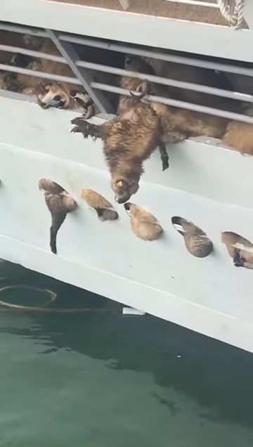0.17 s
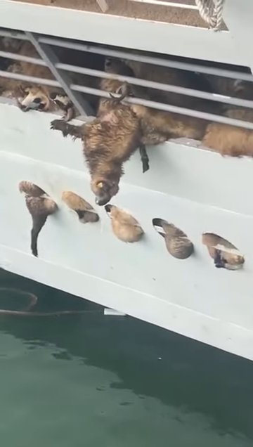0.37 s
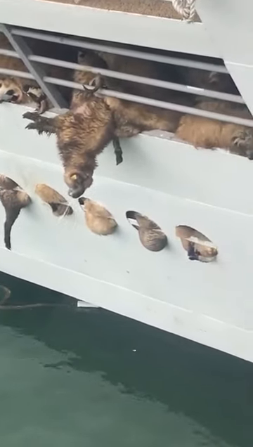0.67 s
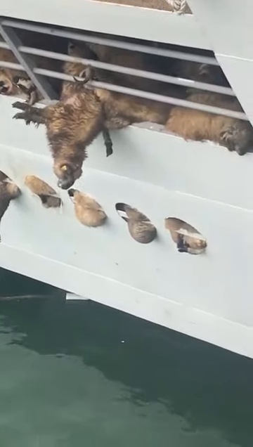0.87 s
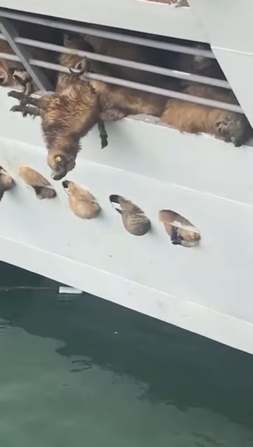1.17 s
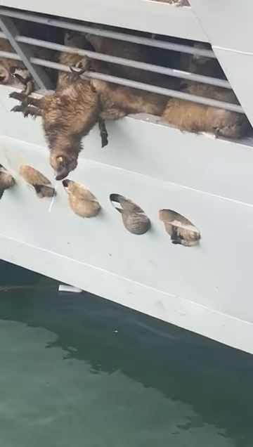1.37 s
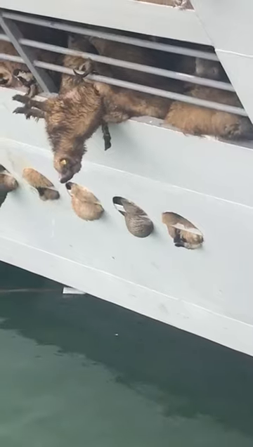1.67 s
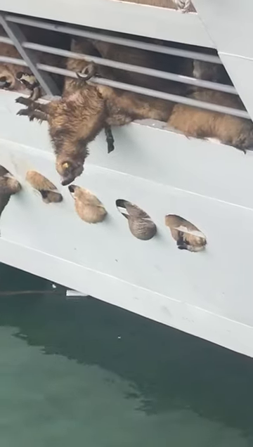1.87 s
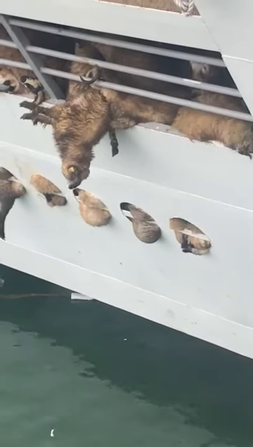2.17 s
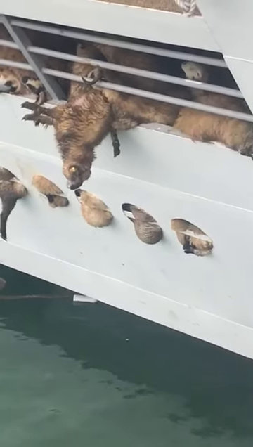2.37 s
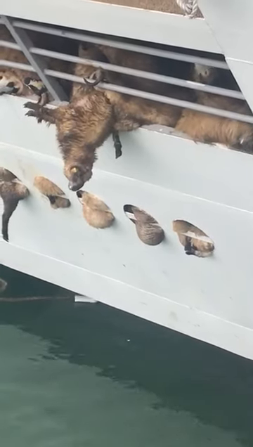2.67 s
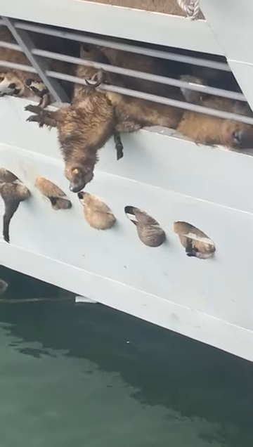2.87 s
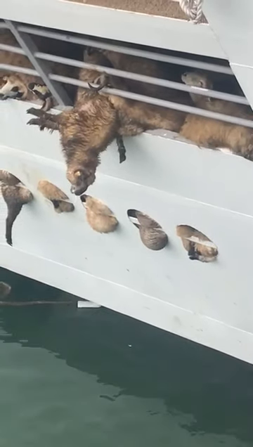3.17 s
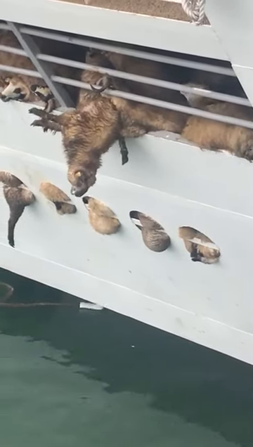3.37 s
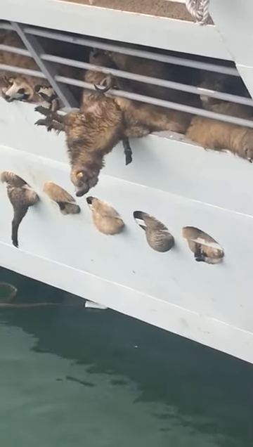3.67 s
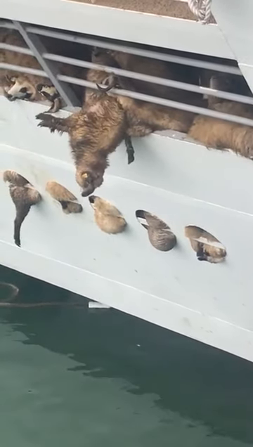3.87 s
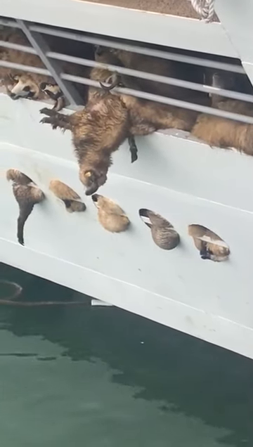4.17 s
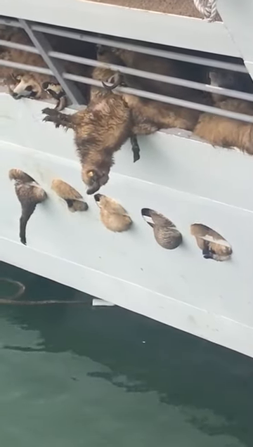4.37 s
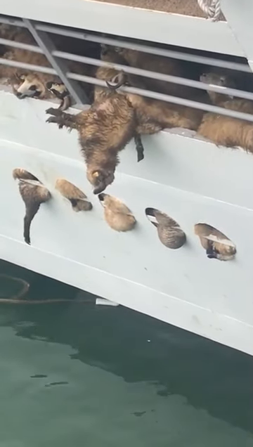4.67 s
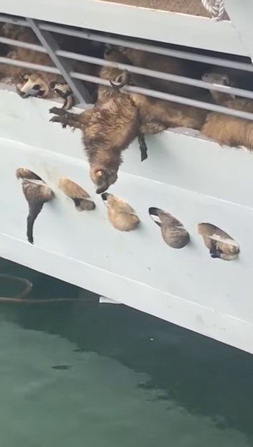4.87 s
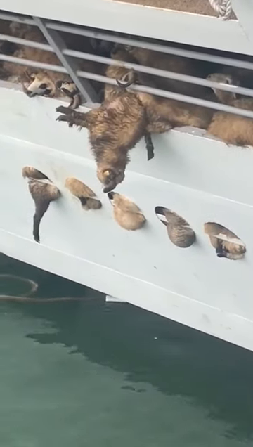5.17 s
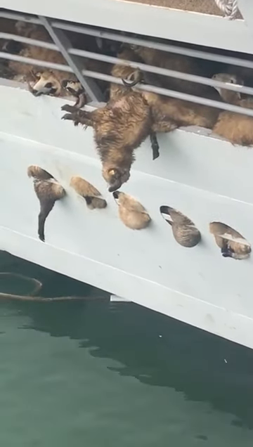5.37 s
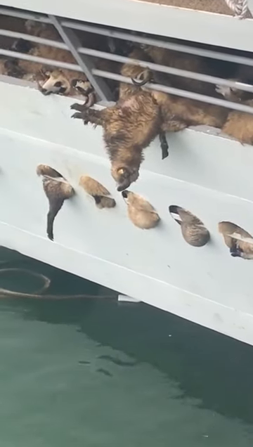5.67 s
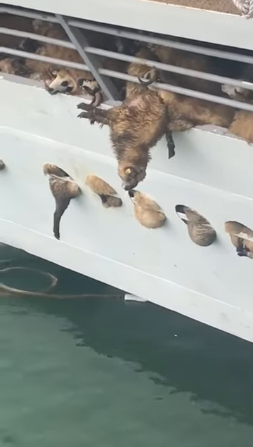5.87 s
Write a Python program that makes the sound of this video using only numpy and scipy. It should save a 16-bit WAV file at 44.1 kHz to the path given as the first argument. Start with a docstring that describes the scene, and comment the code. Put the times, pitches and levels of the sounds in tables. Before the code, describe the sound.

A large ship's engine runs for the whole six seconds, heard outdoors from beside the hull in a harbour. The main sound is a deep, steady diesel drone with a rough exhaust rumble, throbbing slowly as the generators beat against it. Above it, ventilation fans give an even, airy roar with a little hiss and hum, plus a faint mid-pitched whine that pulses about once a second and gradually fades. Small waves slop softly against the hull at about 0.5, 1, 2.8, 3.7, 5 and 5.5 seconds; the one at 2.8 seconds is the fullest, with a low gulp. Faint, bright ticks come at around 1.2, 2.4 and 3.7 seconds, with a quick pair at 5.5. At about 5.9 seconds a thin, rasping metal scrape begins and lasts to the end, while the rumble carries on at the same level.

```python
"""A ship in harbour

Beside the hull, the harmonics of a slow main diesel and of three generators, nearly in step,
superpose and beat over the rough rumble of turbulent exhaust gas. Ventilation fans roar with
broadband flow noise and hum at their blade tones. Water slops softly at the hull; there are
a few faint ticks and, at the end, a thin scrape as friction excites the resonances of metal."""
import sys
import numpy as np
from scipy import signal
from scipy.fft import rfft, irfft, next_fast_len
from scipy.io import wavfile

SR = 44100
rng = np.random.default_rng(int(sys.argv[2]) if len(sys.argv) > 2 else 0)


def generate_wav(sig):
    """Save sig (samples, or channels by samples) to the path in sys.argv[1] as 16-bit PCM at SR."""
    pcm = np.round(np.clip(np.atleast_2d(sig).T, -1, 1) * 32767).astype(np.int16)
    wavfile.write(sys.argv[1], SR, pcm)


N = 264776
TIME = np.arange(N) / SR  # t/s


def main_diesel():
    """Periodic firing: a slow engine drones at multiples of its cycle rate and eases off a little."""
    # harmonics of the drone: order, level/dB at unit gain
    orders = [(9, -35), (10, -48), (12, -24.5), (14, -42.5), (15, -28.5), (17, -46), (19, -40.5),
              (25, -37.5), (26, -42.5), (27, -43), (29, -47.5), (31, -44.5), (50, -46)]
    # envelope of the drone: t/s, gain/dB
    envelope = [(0, -0.6), (1.4, -0.1), (2.6, 1), (4.3, -2), (5.3, -3.7), (5.8, 1)]
    cycle_hz, ease_s, ease_share = 5.418, 4.0, 0.001
    speed_hz = cycle_hz * (1 - ease_share * (TIME > ease_s))
    return along(envelope) * engine(speed_hz, orders, cycle_start_s=1.7445, unsteady=0.057)


def engine(speed_hz, orders, cycle_start_s, unsteady):
    """Fourier synthesis: each order wavers with the combustion; the low ones align as a cycle begins."""
    scatter_hz = 200  # above this, echoes from the hull scatter the phases
    turns = np.cumsum(speed_hz * np.ones(N)) / SR
    turns -= np.interp(cycle_start_s, TIME, turns)
    out = np.zeros(N)
    for order, db in orders:
        scatter = rng.random() * (order * np.mean(speed_hz) > scatter_hz)
        waver = 1 + unsteady * drift(1.5)
        out -= waver * tone(order * turns + scatter, db)
    return out


def generators(first_speed_hz):
    """Beating: the harmonics of three generators at nearly one speed add up to a slow throb."""
    # harmonics of the first generator: order, level/dB at unit gain
    first_orders = [(5, -26.3), (10, -30.5)]
    # envelope of the first generator: t/s, gain/dB
    envelope = [(0, -0.5), (1.1, -1.5), (1.7, 1), (2.2, 0.5), (2.7, -1.5), (3.5, 2.5), (4.6, 2), (5.3, -.5),
                (6, 0)]
    # harmonics of the second generator: order, level/dB
    second_orders = [(5, -49.5), (6, -36.5), (12, -40), (27, -46.5), (28, -47.5), (29, -49), (30, -48)]
    # harmonics of the third generator: order, level/dB
    third_orders = [(3, -34.5), (6, -47), (10, -49), (11, -39.5), (12, -35), (14, -47.5), (17, -45.5),
                    (18, -48), (24, -54.5)]
    second_hz, third_hz = 14.95, 15.035
    # the cycle starts set how the throbs fall together
    first = engine(first_speed_hz, first_orders, cycle_start_s=1.8478, unsteady=0.027)
    second = engine(second_hz, second_orders, cycle_start_s=1.8844, unsteady=0.1)
    third = engine(third_hz, third_orders, cycle_start_s=1.7415, unsteady=0.16)
    return along(envelope) * first + second + third


def generator_speed():
    """Speed droop: a passing load slows the first generator; its governor then settles a little high."""
    cycle_hz, sag_s, sag_width_s = 15.105, 2.27, 0.45
    sag_share, overshoot_share = 0.0068, 0.0008
    sag = sag_share * np.exp(-((TIME - sag_s) / sag_width_s) ** 2)
    return cycle_hz * (1 - sag + overshoot_share * (TIME > sag_s))


def exhaust(speed_hz):
    """Amplitude modulation: turbulent gas leaves the funnel in puffs, several to an engine cycle."""
    # spectrum of the deep boom: f/Hz, relative density/dB
    boom_spectrum = [(10, -20), (24, -13), (36, -10), (46, -1), (52, 9.5), (60, 9), (72, 5.5), (84, 2),
                     (97, 5), (106, 10.5), (125, -13), (200, -43)]
    # envelope of the boom: t/s, level/dB between crest and trough of the puffs
    boom_envelope = [(0, -29.5), (.75, -28), (1.9, -30.5), (2.45, -29.5), (3.15, -29.5), (4.2, -30),
                     (5.0, -28.5), (6, -29)]
    # spectrum of the growl, with the funnel's resonances: f/Hz, relative density/dB
    growl_spectrum = [(70, -17), (112, -2), (135, -.8), (149, 2), (160, -3.5), (172, .7), (190, 1.2),
                      (212, -.8), (236, -7.5), (254, -4.5), (266, -9.5), (282, -6.5), (305, -10.5),
                      (450, -18.5), (900, -64)]
    # envelope of the growl: t/s, level/dB between crest and trough of the puffs
    growl_envelope = [(0, -25), (.32, -26), (.41, -25), (.52, -26), (.72, -27), (1.12, -24), (1.4, -25),
                      (2.6, -23.5), (2.75, -29), (2.87, -26.5), (2.98, -27), (3.37, -22.5), (3.8, -27.5),
                      (4.08, -23), (4.25, -26.5), (4.8, -24), (5.05, -24), (5.45, -26), (6, -25.5)]
    puffs_per_cycle, depth = 5, 0.16
    turns = np.cumsum(speed_hz) / SR
    puffs = 1 + depth * np.cos(2 * np.pi * puffs_per_cycle * turns)
    boom = coloured(boom_spectrum) * along(boom_envelope)
    growl = coloured(growl_spectrum) * along(growl_envelope)
    return puffs * (boom + growl)


def fan_airflow():
    """Flow noise: the roar of the fans and the hiss of the grilles share one slightly uneven airflow."""
    # air rushing through the fans: f/Hz, relative density/dB
    roar_spectrum = [(100, -22), (300, -1), (420, 0), (500, -2), (595, 1.5), (650, 0), (720, -1),
                     (780, -3.5), (830, -0.8), (900, -1.7), (990, -1), (1200, -4), (1290, -5.5), (1350, -6),
                     (1400, -4), (1470, -6.5), (1570, -8), (1900, -12), (2900, -19.5), (9000, -47.5)]
    # hiss at the vent grilles: f/Hz, relative density/dB
    hiss_spectrum = [(1500, -19), (3000, -2), (3700, 2.5), (4400, 3.5), (4900, -2.5), (5300, -2),
                     (7000, -5), (7600, -7.5), (8300, -4.5), (9200, -10.5), (10000, -12.5), (10400, -30),
                     (10900, -31), (12000, -44.5)]
    roar_db, hiss_db, flutter_db, swell_db = -28.5, -47.5, 0.36, 0.19
    flow = gain_of(flutter_db * drift(28) - swell_db * drift(1.8))
    roar = gain_of(roar_db) * coloured(roar_spectrum)
    hiss = gain_of(hiss_db) * coloured(hiss_spectrum)
    return flow * (roar + hiss)


def machinery_hum():
    """Tonal noise of rotation: pumps and fan blades give steady tones, of which the lowest two beat."""
    # tones of pumps and blades: f/Hz, level/dB
    hums = [(31.0, -41), (31.7, -43), (568.1, -54), (672.0, -52), (752.8, -54)]
    return sum(tone(hz * TIME + rng.random(), db) for hz, db in hums)


def fan_whine():
    """Interference: the blade tones of two like fans beat about once a second as they slowly fade."""
    # lower and upper blade tone: f/Hz
    blade_tones = [650.85, 652.0]
    low_hz, high_hz = blade_tones
    start_db, fade_db_per_s, weaker_db, in_step_s = -39.8, 1.7, 7, 2.33
    db = start_db - fade_db_per_s * TIME
    turns = high_hz * TIME + rng.random()
    lead = (high_hz - low_hz) * (TIME - in_step_s)
    return tone(turns, db) + tone(turns - lead, db - weaker_db)


def water():
    """Noise bands under one envelope: each small wave at the hull gulps, washes and fizzes at once."""
    # slops: peak t/s, duration/s, gulp level/dB, wash level/dB, fizz level/dB
    slops = [(.49, .26, -42, -47, -55), (0.997, .2, -56, -44, -59), (2.797, 0.27, -30, -46, -60),
             (3.72, .25, -38, -50, -57), (5.008, 0.32, -36, -52, -60), (5.45, 0.26, -56, -42, -60)]
    gulp = ringing(centre_hz=275, width_hz=84)
    wash = ringing(centre_hz=1830, width_hz=2500)
    fizz = ringing(centre_hz=6960, width_hz=5500)
    grains = gain_of(2.2 * drift(200))
    fizz = unit_rms(fizz * grains)
    out = np.zeros(N)
    for peak_s, length_s, gulp_db, wash_db, fizz_db in slops:
        swell = np.exp(-(2 * (TIME - peak_s) / length_s) ** 2)
        out += swell * (gain_of(gulp_db) * gulp + gain_of(wash_db) * wash + gain_of(fizz_db) * fizz)
    return out


def scrape():
    """Frictional excitation: rasping contact drives several narrow resonances of metal and a broad one."""
    # modes of the metal: f/Hz, bandwidth/Hz, level/dB before the rasp
    modes = [(1730, 350, -42), (1960, 55, -42), (3670, 110, -51), (3880, 480, -46.5), (4900, 3300, -49),
             (5060, 280, -57), (5380, 110, -57)]
    start_s, attack_s, rasp_db, catches_per_s = 5.892, 0.045, 2, 80
    ring = sum(gain_of(db) * ringing(hz, width_hz) for hz, width_hz, db in modes)
    pressure = np.clip((TIME - start_s) / attack_s, 0, 1)
    rasp = gain_of(rasp_db * drift(catches_per_s))
    return ring * pressure * rasp


def ticks():
    """Exponential decay: each faint tick is a bright band of noise that starts abruptly and dies fast."""
    # ticks: t/s, initial level/dB, f/Hz, bandwidth/Hz, T60/s
    events = [(1.245, -47, 7000, 5000, .08), (2.400, -45.5, 7200, 7500, .12), (3.655, -40, 2650, 300, 0.28),
              (5.493, -50.5, 11300, 900, .08), (5.492, -40, 3900, 480, 0.1), (5.546, -44, 5800, 2500, 0.12)]
    out = np.zeros(N)
    for start_s, db, hz, width_hz, t60 in events:
        age = TIME - start_s
        decay = (age > 0) * gain_of(db - 60 * abs(age) / t60)
        out += decay * ringing(hz, width_hz)
    return out


def gain_of(db):
    """The decibel scale: 20 dB to a factor of ten in amplitude."""
    return 10 ** (np.asarray(db) / 20)


def along(points):
    """Amplitude envelope through (t/s, level/dB) points."""
    times, db = np.transpose(points)
    return gain_of(np.interp(TIME, times, db))


def tone(turns, db):
    """Simple harmonic motion of given rms level, with its phase counted in turns."""
    return np.sqrt(2) * gain_of(db) * np.cos(2 * np.pi * turns)


def unit_rms(x):
    """Normalisation to rms 1."""
    return x / np.sqrt(np.mean(x ** 2) + 1e-20)


def noise(shape):
    """Spectral shaping: noise of rms 1 whose amplitude spectrum follows shape(f/Hz)."""
    size = next_fast_len(N, True)
    hz = np.fft.rfftfreq(size, 1 / SR)
    spectrum = rfft(rng.standard_normal(size)) * shape(hz)
    return unit_rms(irfft(spectrum, size)[:N])


def coloured(points):
    """Coloured noise of rms 1 through (f/Hz, relative density/dB) points on a log frequency axis."""
    f, db = np.transpose(points)
    return noise(lambda hz: gain_of(np.interp(np.log(hz + 1), np.log(f + 1), db)))


def ringing(centre_hz, width_hz):
    """Resonance: noise of rms 1 in one band, 6 dB down at the edges of its width."""
    return noise(lambda hz: 1 / (1 + (2 * (hz - centre_hz) / width_hz) ** 2))


def drift(rate_hz):
    """Random fluctuation: low-pass noise of rms 1, reaching up to about rate_hz."""
    return noise(lambda hz: np.exp(-(hz / rate_hz) ** 2))


def scene():
    """Superposition: engines, exhaust, fans, water and small sounds add in one channel."""
    speed_hz = generator_speed()
    engines = main_diesel() + generators(speed_hz)
    rumble = exhaust(speed_hz)
    ventilation = fan_airflow() + machinery_hum() + fan_whine()
    return (engines + rumble + ventilation + water() + ticks() + scrape())[None]


def record(dry):
    """Band limiting: the microphone drops the deepest bass, and a steep low-pass cuts the top treble."""
    low_edge_hz, high_edge_hz = 24, 11850
    highpass = signal.butter(2, low_edge_hz, "highpass", fs=SR, output="sos")
    lowpass = signal.firwin(601, high_edge_hz, window=("kaiser", 9), fs=SR)
    return signal.oaconvolve(signal.sosfilt(highpass, dry), lowpass[None], "same")


dry = scene()
out = record(dry)
generate_wav(out)
```